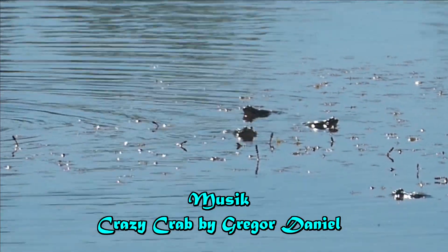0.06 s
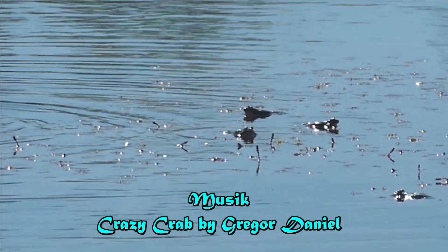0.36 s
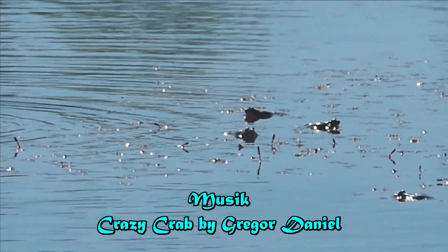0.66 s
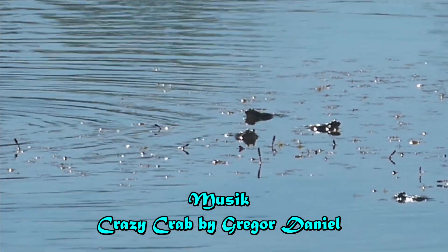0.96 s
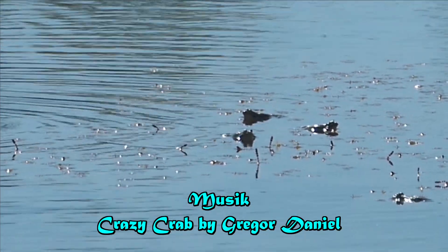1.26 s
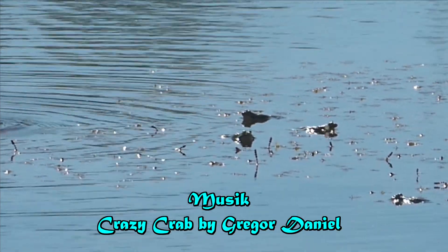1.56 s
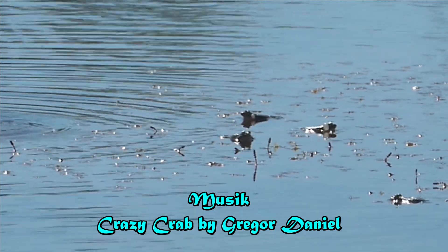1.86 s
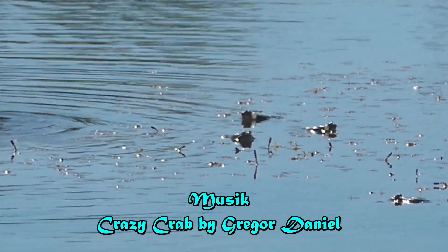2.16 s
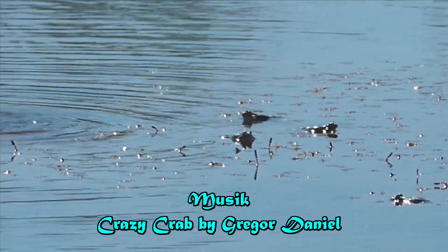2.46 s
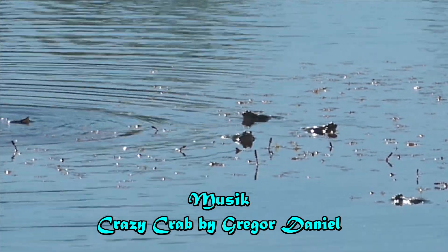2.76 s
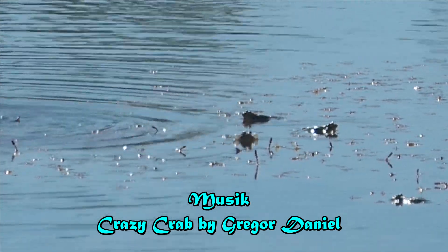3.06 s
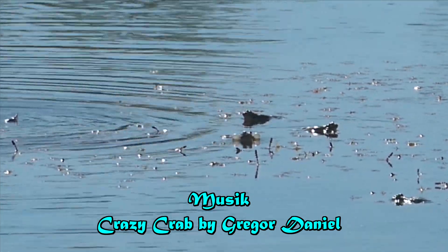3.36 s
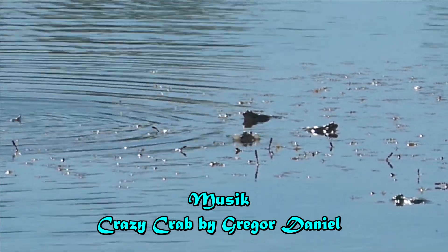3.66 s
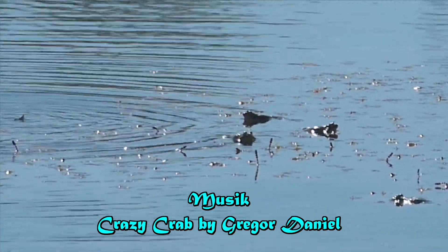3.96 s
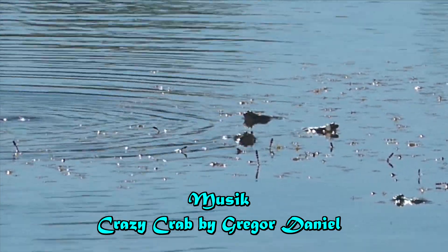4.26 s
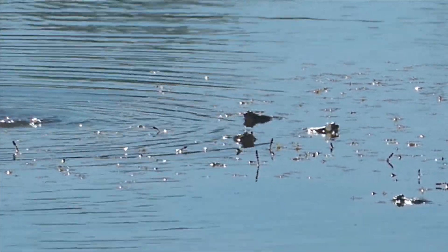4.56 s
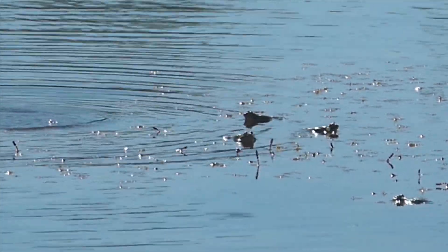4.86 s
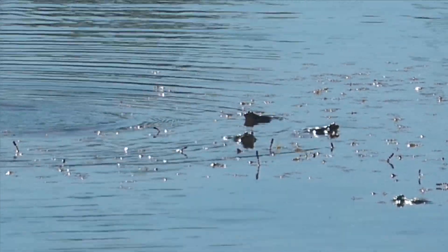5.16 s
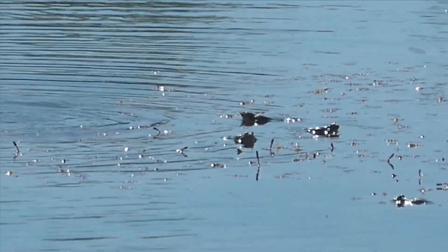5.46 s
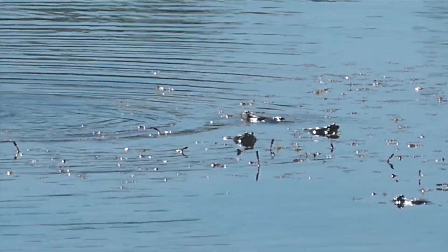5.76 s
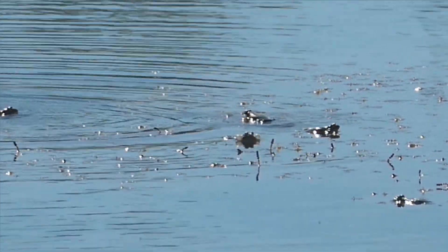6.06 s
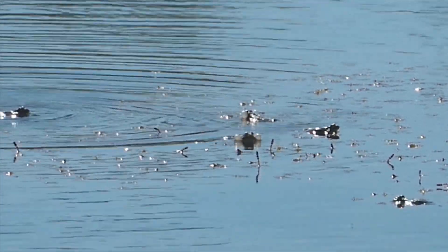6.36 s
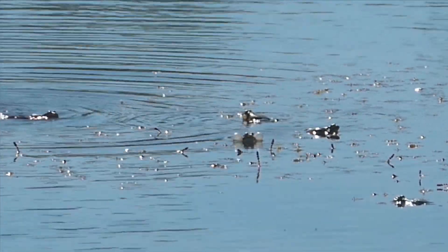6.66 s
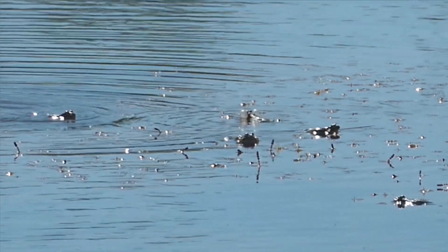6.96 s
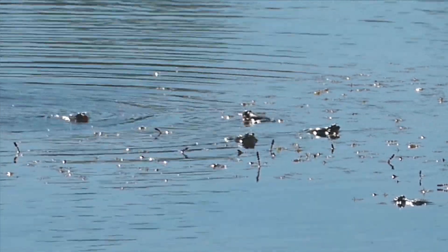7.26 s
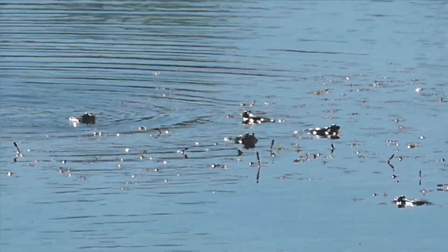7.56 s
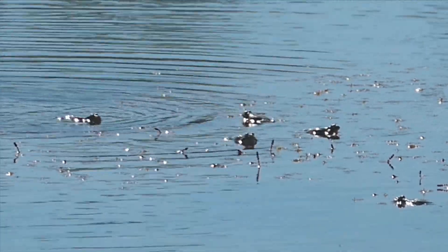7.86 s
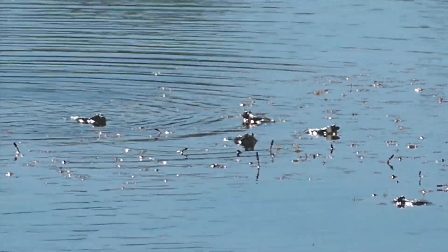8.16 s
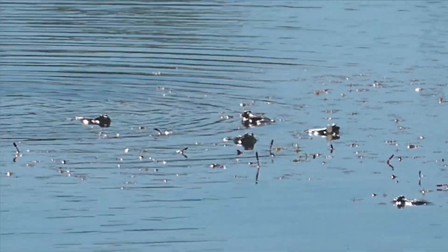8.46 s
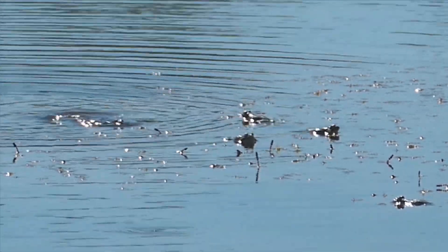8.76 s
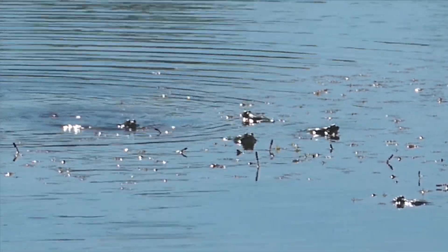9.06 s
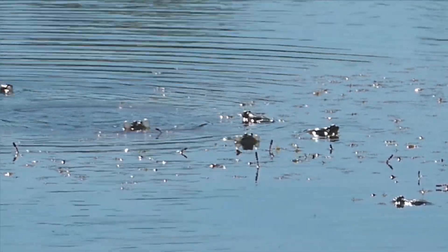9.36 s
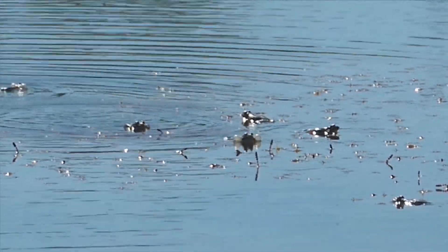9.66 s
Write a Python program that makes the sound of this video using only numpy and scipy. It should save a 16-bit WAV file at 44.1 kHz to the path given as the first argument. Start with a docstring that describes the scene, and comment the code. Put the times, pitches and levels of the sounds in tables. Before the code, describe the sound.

Close pond frogs call in overlapping laughing quacks, rattles and low croaks over a distant chorus and faint rumble.

```python
"""Marsh frogs on a pond

Close to the microphone, straight ahead, frogs call over each other: laughing runs of short quacks,
longer rattles and low croaks. Each note is a burst of larynx pulses that ring the vocal sacs, slowing
into separate ticks as the air runs out. Farther off a chorus burbles over a faint rumble, the banks
answer softly, and three hoots carry from across the water."""
import sys
import numpy as np
from scipy import signal
from scipy.fft import rfft, irfft, next_fast_len
from scipy.io import wavfile
from scipy.ndimage import map_coordinates

SR = 44100
rng = np.random.default_rng(int(sys.argv[2]) if len(sys.argv) > 2 else 0)


def pcm_store(signal):
    """Save signal as 16-bit PCM."""
    levels = np.round(np.clip(np.atleast_2d(signal), -1, 1) * 32767)
    wavfile.write(sys.argv[1], SR, levels.astype(np.int16).T)


N = 428211

# Near runs. Rasp, overtone and whistle are relative to the level; each kind of call adds its own trims.
# (first note [s], last note [s], count, hurry [+ speeds up, - slows], note length [s],
# first sac pitch [Hz], last [Hz], first level [dB], midway [dB], last [dB], rasp [dB],
# first overtone [Hz], last [Hz], overtone [dB], whistle [Hz], whistle [dB])
NEAR_QUACK_RUNS = [(0.0, 0.394, 5, -0.011, .046, 2246, 2280, -30.5, -27, -33.5, 0.5, 4040, 3990, -6, 8760, -39.5),
                   (0.504, 0.983, 6, 0, .029, 2364, 2456, -32, -31, -30.5, -16, 4070, 3940, -22, 9200, -53),
                   (1.386, 1.858, 6, 0.0023, .038, 2400, 2354, -32, -25, -27.5, 0, 3930, 3960, -6, 9350, -39.5),
                   (2.04, 2.435, 5, -0.016, 0.035, 2820, 2670, -38, -38, -40.5, -26.5, 4020, 3900, -15.5, 10500, -47),
                   (2.54, 3.345, 10, .07, .032, 2410, 2450, -33, -26.5, -29, -4, 3870, 4050, -7, 9400, -49),
                   (4.03, 4.105, 2, 0, 0.028, 2170, 2150, -45.5, -45, -45, -29, 4470, 4550, -11, 9500, -51),
                   (4.385, 4.79, 5, -.1, 0.064, 2130, 2330, -38, -38, -40.5, -22.5, 4930, 4690, -12.5, 10400, -35.5),
                   (4.975, 5.258, 4, -0.042, .038, 2260, 2387, -35, -33.5, -29, -28, 4000, 3960, -25, 10750, -42.5),
                   (6.165, 6.553, 5, 0, 0.036, 2390, 2320, -34.5, -31.5, -34, -5.5, 4270, 4130, -19, 9100, -54),
                   (7.865, 8.06, 3, -0.012, .028, 2290, 2360, -40, -35.5, -36, -10, 4400, 4230, -11, 10000, -55),
                   (8.128, 8.565, 5, 0.021, 0.041, 2190, 2320, -43.5, -28.5, -35.5, -11, 4440, 4170, -22.5, 9700, -49),
                   (8.897, 9.155, 6, -0.062, 0.033, 2320, 2450, -38.5, -41, -41, -16.5, 3850, 3830, -23, 9370, -54)]
NEAR_RATTLE_RUNS = [(0.97, 1.372, 5, .1, 0.074, 1798, 1896, -30.5, -23, -25.5, -14, 4440, 3700, -9.5, 9760, -46),
                    (1.52, 2.135, 8, .2, .06, 1575, 1842, -32.5, -24, -29, -12.5, 5090, 4800, -16, 9770, -55),
                    (3.045, 3.548, 6, -0.1, 0.044, 1824, 1700, -28.5, -19, -23.5, -13, 4430, 4170, -9.5, 9900, -51.5),
                    (3.18, 3.4, 3, -0.058, 0.043, 1880, 1918, -22, -21, -23, -8.5, 4020, 3810, -5.5, 10630, -63),
                    (4.387, 4.768, 5, -0.071, 0.066, 1742, 1910, -23.5, -31, -24.5, -10.5, 3780, 4000, -18, 10460, -44),
                    (5.028, 5.578, 6, -.03, .052, 1928, 1676, -26, -22, -31.5, -12, 3970, 3780, -2, 10200, -34.5),
                    (5.67, 6.074, 5, 0.034, 0.035, 1722, 1832, -25.5, -24.5, -29, -14, 4240, 4030, -15, 9500, -33),
                    (6.197, 6.725, 6, -0.0017, 0.045, 1820, 1666, -27, -19.5, -25, -15, 4584, 3770, -10.5, 9870, -56.5),
                    (6.812, 7.287, 6, .02, 0.04, 1750, 1627, -30, -29.5, -31.5, -9, 4070, 4100, -7, 9530, -30.5),
                    (7.485, 7.818, 4, 0.056, 0.041, 1927, 1774, -20.5, -21.5, -21.5, -12, 3770, 3830, -2.5, 10480, -55.5),
                    (7.915, 8.672, 8, -.1, .05, 1857, 1893, -24, -24.5, -28.5, -14, 4820, 4870, -14, 9870, -51),
                    (8.545, 8.83, 4, 0.036, .035, 1780, 1654, -25, -31, -26, -18.5, 4160, 4200, -11, 9530, -36.5)]
# Near single calls: (start [s], length [s], early sac pitch [Hz], late sac pitch [Hz], level [dB],
# rasp relative to the level [dB], overtone [Hz])
NEAR_QUACKS = [(2.386, 0.028, 2524, 2460, -42, -23, 3900), (2.59, .008, 2500, 2410, -50.5, 1.5, 3970),
               (.832, 0.01, 2450, 2440, -43, -6, 3970), (.924, 0.0066, 2450, 2260, -43.5, -1, 3970),
               (2.604, .008, 2750, 2680, -37, -9, 3970), (5.195, 0.037, 2486, 2740, -29.5, -33, 3470),
               (6.025, 0.02, 2610, 2360, -43.5, 4, 3560), (9.105, 0.023, 2410, 2380, -45, 0, 3640)]
NEAR_RATTLES = [(0, 0.055, 1817, 1567, -29, -22.5, 4080), (.236, 0.043, 1720, 1694, -30.5, -29, 4270),
                (.405, 0.053, 1777, 1880, -29.5, -9.5, 3860), (.6, .05, 1560, 1497, -32, -12.5, 3950),
                (.74, 0.048, 1690, 1766, -34.5, -14, 4500), (.858, 0.03, 1900, 1864, -32.5, -11.5, 3350),
                (1.8, 0.19, 1604, 1676, -32.5, -8.5, 4320), (2.44, 0.048, 1790, 1890, -34.5, -10, 4080),
                (2.62, 0.12, 1610, 1638, -35, -12, 4060), (2.75, .14, 1763, 1603, -30.5, -11.5, 3930),
                (3.651, 0.042, 1763, 1667, -27.5, -9, 3950), (3.713, 0.012, 1680, 1680, -35.5, -15.5, 4100),
                (4.29, 0.16, 1745, 1602, -29, -8, 3390), (4.835, 0.12, 1600, 1654, -23.5, -20, 4180),
                (5.305, 0.03, 1580, 1507, -24, -30.5, 4200), (5.385, 0.027, 1620, 1530, -22, -27.5, 3870),
                (5.43, .11, 1677, 1606, -24.5, -45.5, 3800), (6.602, 0.019, 1550, 1510, -33, -18.5, 3860),
                (6.93, 0.24, 1705, 1746, -30.5, -24, 4200), (7.37, .14, 1760, 1710, -22, -16, 3870),
                (8.17, 0.14, 1720, 1650, -28, -22, 4400), (8.64, .11, 1853, 1846, -31.5, -25, 4300),
                (7.292, .06, 1694, 1670, -30, -16.5, 3250), (8.275, 0.032, 1560, 1522, -27.5, -18.5, 4370),
                (8.71, .165, 1697, 1590, -23, -30.5, 4100), (9.22, 0.093, 1850, 1726, -24, -21.5, 4200),
                (9.295, 0.12, 1606, 1596, -24, -18, 3700), (9.425, .045, 1683, 1630, -22.5, -15, 3650),
                (9.485, 0.1, 1817, 1795, -27.5, -12.5, 4180), (9.595, .05, 1820, 1740, -24.5, -11.5, 4350),
                (9.648, .06, 1815, 1742, -26, -9, 3850)]
NEAR_CROAKS = [(0, 0.047, 1120, 1122, -26, -37, 4260), (.14, 0.058, 1160, 1204, -31.5, -29, 4100),
               (.45, 0.15, 1054, 1116, -27.5, -17, 4280), (.735, .05, 540, 686, -39, -31.5, 4500),
               (.768, 0.069, 900, 1140, -34.5, -22, 4500), (.828, 0.044, 1160, 1070, -36, -23.5, 3470),
               (.84, 0.047, 810, 683, -44, -16, 3500), (1.05, 0.18, 1172, 1237, -27.5, -16, 4500),
               (1.36, .12, 1092, 1140, -27, -13.5, 3930), (1.62, .1, 1255, 1272, -28, -30, 3920),
               (2.03, .18, 1147, 1217, -23.5, -12.5, 3460), (2.2, 0.1, 1206, 1275, -29, -20.5, 4240),
               (2.39, 0.15, 1230, 1274, -29.5, -22.5, 3950), (2.72, .15, 1228, 1095, -28, -23.5, 4000),
               (2.95, 0.12, 1016, 1060, -35, -19.5, 3460), (3.31, 0.12, 1241, 1113, -37, -17, 3900),
               (3.49, 0.1, 1042, 1155, -23, -13.5, 3750), (3.725, .11, 1238, 1300, -30, -15, 4100),
               (3.85, 0.068, 1063, 1110, -28.5, -25.5, 3540), (3.91, 0.059, 1430, 1580, -31, -17.5, 4100),
               (4.06, 0.12, 1050, 1215, -43, -20, 4400), (4.174, 0.033, 1260, 1400, -37, -12.5, 3900),
               (4.27, 0.23, 983, 1118, -32.5, -11.5, 3560), (4.42, 0.13, 1120, 1126, -29.5, -5.5, 3830),
               (4.77, 0.13, 1179, 1023, -29, -12, 4020), (5.06, .09, 1210, 1170, -29, -28.5, 4000),
               (5.52, 0.084, 1131, 1292, -30.5, -29.5, 3820), (5.89, 0.088, 1316, 1210, -30.5, -20.5, 4100),
               (6.03, 0.079, 1130, 1064, -31, -12, 3780), (6.125, 0.06, 1050, 1136, -22, -15.5, 3600),
               (6.17, 0.11, 1227, 1254, -26, -6.5, 3200), (6.44, 0.085, 1197, 1231, -28.5, -20.5, 4180),
               (6.68, 0.11, 737, 833, -41, -33, 3600), (6.73, 0.031, 930, 1023, -30.5, -16.5, 3770),
               (6.78, 0.079, 1190, 1234, -25, -17.5, 3540), (6.865, 0.041, 1030, 953, -31, -17.5, 3640),
               (7.135, 0.045, 1220, 1344, -34.5, -28.5, 4100), (6.89, .21, 1234, 1186, -28, -17, 3940),
               (7.3, 0.12, 1223, 1194, -26.5, -19, 4000), (7.47, .17, 1266, 1266, -25, -12.5, 3840),
               (7.65, 0.17, 1256, 1362, -29, -22, 4240), (7.93, 0.17, 1357, 1287, -30, -20, 4670),
               (8.47, 0.12, 1370, 1142, -28, -9.5, 4080), (8.72, 0.18, 1068, 1256, -30.5, -36.5, 4170),
               (9.04, 0.093, 1130, 1040, -32, -19.5, 4190), (9.13, .035, 1091, 1157, -22.5, -21.5, 3500),
               (9.25, 0.13, 1145, 1092, -34.5, -8, 3700), (9.42, .16, 1219, 1280, -26.5, -13, 3600),
               (9.6, 0.12, 1065, 1210, -30.5, -48, 4090)]
# Spectra of the snap in the mouth and the knock in the throat: (frequency [Hz], gain [dB])
MOUTH_SPECTRUM = [(100, -41), (1500, -27), (2400, 1), (3250, 11), (3550, 8.5), (3950, 5), (4300, -12.5),
                  (5000, -11.5), (9000, -30.5), (12500, -25.5), (15000, -40.5)]
THROAT_SPECTRUM = [(60, -54), (150, -26.5), (290, -7.5), (360, 3.5), (520, 14), (800, -1), (1150, 16.5),
                   (1500, -14.5), (2500, 6), (4000, -44), (9000, -67.5)]
# Swell of the far chorus's three layers: (time [s], relative level [dB])
BURBLE_LEVELS = [(0.0, -43.5), (0.57, -39.5), (0.7, -45.5), (0.9, -43), (1.32, -36), (2.0, -40.5),
                 (2.16, -30.5), (2.3, -39.5), (2.54, -41.5), (2.68, -38), (3.22, -43), (3.43, -38),
                 (3.86, -40), (4.0, -44.5), (4.19, -42.5), (4.44, -35.5), (5.0, -38), (5.11, -40),
                 (5.46, -37), (5.73, -39.5), (6.11, -32), (6.54, -43), (6.68, -46), (6.76, -36.5),
                 (6.89, -30), (6.95, -33.5), (7.11, -39), (7.36, -42.5), (7.49, -36), (7.68, -41),
                 (8.71, -36.5), (8.9, -40.5), (9.19, -41.5), (9.36, -36), (9.55, -40.5), (9.71, -34.5)]
BIG_FROG_LEVELS = [(0.0, -36), (0.81, -47.5), (1.05, -33), (1.16, -33), (2.38, -30), (2.51, -34),
                   (3.08, -36), (3.46, -30), (3.78, -37), (3.95, -45), (4.22, -41.5), (4.49, -29),
                   (4.62, -33.5), (5.06, -43), (5.46, -29.5), (5.62, -39.5), (5.81, -36.5), (6.11, -27),
                   (6.38, -31.5), (6.54, -41), (6.79, -39), (6.95, -24.5), (7.11, -38), (7.3, -37.5),
                   (7.54, -25.5), (7.98, -40.5), (8.33, -33), (8.71, -32.5), (8.87, -40.5), (9.11, -32.5),
                   (9.27, -33), (9.71, -27)]
SMALL_FROG_LEVELS = [(0.0, -34.5), (0.38, -37), (0.84, -45), (1.22, -33.5), (1.89, -26), (2.14, -35),
                     (2.51, -39), (2.68, -43.5), (3.11, -43), (3.3, -30), (3.49, -34), (3.6, -38),
                     (4.05, -54), (4.33, -51), (4.49, -28.5), (4.79, -26), (5.11, -33), (5.38, -28),
                     (5.54, -43), (5.81, -39), (6.44, -29), (6.79, -44.5), (6.95, -33), (7.11, -47),
                     (7.3, -46), (7.44, -25.5), (7.54, -19.5), (7.76, -50.5), (7.95, -45.5), (8.17, -32),
                     (8.52, -36), (8.71, -23), (9.0, -39.5), (9.25, -42), (9.41, -28), (9.71, -28.5)]
# Their spectra at a distance: (frequency [Hz], gain [dB])
BURBLE_SPECTRUM = [(60, -58), (150, -38), (290, -11.5), (355, 11), (520, 7), (800, 8), (1100, 3),
                   (1600, -17), (3000, -29), (9000, -70.5)]
BIG_FROG_SPECTRUM = [(100, -55), (600, -27), (900, -6), (1180, 0.5), (1400, -2.5), (1700, -12.5),
                     (2450, -6), (3200, -15), (5000, -25.5), (9000, -58.5)]
SMALL_FROG_SPECTRUM = [(100, -56), (900, -25.5), (1400, -3.5), (1750, 5), (2100, -9), (2450, 1),
                       (3200, -11), (4000, -7.5), (5000, -24.5), (9000, -49)]
# Echo off the banks: (frequency [Hz], time to fall 60 dB [s])
BANK_DECAY = [(300, 0.17), (1500, 0.28), (5000, 1)]
# Swell of the outdoor rumble: (time [s], relative level [dB])
RUMBLE_LEVELS = [(0.0, -51.5), (0.4, -58), (2.27, -45.5), (2.68, -56.5), (5.03, -46.5), (5.35, -53.5),
                 (8.71, -57.5), (9.6, -51.5), (9.71, -53)]
# Spectra of that rumble, the deep one under it and the hiss: (frequency [Hz], gain [dB])
RUMBLE_SPECTRUM = [(25, -38.5), (50, -41.5), (80, -20), (110, -13), (150, -0.5), (220, 2.5), (300, 3),
                   (500, -11.5), (1500, -24), (5000, -71)]
DEEP_SPECTRUM = [(25, -22.5), (50, -14), (80, 3.5), (110, 0), (160, -8), (400, -32.5), (2000, -70.5)]
HISS_SPECTRUM = [(100, -2.5), (1000, -15), (2500, -7), (5000, -9), (10000, -8.5), (15000, -12.5)]
# Hoots across the water: (start [s], length [s], pitch [Hz], level [dB])
FAR_HOOTS = [(4.195, 0.15, 353, -47), (6.662, 0.11, 372, -43), (7.166, 0.16, 365.4, -44)]
# A hoot's harmonics, from the first to the third: (relative level [dB])
HOOT_HARMONICS = [10, 6, -12]
# Treble response of the recorder: (frequency [Hz], gain [dB])
RECORDER_TONE = [(4600, 0), (5100, -11.5), (5500, -24.5), (5900, -43), (7600, -44.5), (8300, -19),
                 (9000, -5.5)]

LEAD_S, TAIL_S = .016, .011  # faint pulses run ahead of a note; a last tick or two trail it


def amp(db):
    """Decibels to gain."""
    return 10 ** (np.asarray(db) / 20)


def unit(x):
    """x scaled to rms 1."""
    return x / np.sqrt(np.mean(x ** 2) + 1e-20)


def unit_like(x, model):
    """x scaled to the energy of model."""
    return x * np.linalg.norm(model) / (np.linalg.norm(x) + 1e-20)


def along(points, hz):
    """Interpolate (frequency, value) points on a log axis."""
    freqs, values = np.transpose(points)
    return np.interp(np.log(hz + 1), np.log(freqs + 1), values)


def swell(points, trim_db):
    """One gain per sample from (time, level) points."""
    times, db = np.transpose(points)
    return amp(np.interp(np.arange(N) / SR, times, db) + trim_db)


def wobble(rate, size):
    """A smooth random curve, rate knots a second."""
    knots = rng.standard_normal(int(size * rate / SR) + 4)
    return map_coordinates(knots, [np.arange(size) * rate / SR])


def filtered(x, response):
    """x times a gain that depends on frequency."""
    size = next_fast_len(N + SR // 2)
    return irfft(rfft(x, size) * response(np.fft.rfftfreq(size, 1 / SR)), size)[..., :N]


def coloured(x, spectrum, size=2048):
    """x through a causal filter of unit energy with this spectrum."""
    cepstrum = irfft(np.log(amp(along(spectrum, np.fft.rfftfreq(size, 1 / SR)))))
    cepstrum[1:size // 2] *= 2
    cepstrum[size // 2 + 1:] = 0
    kernel = irfft(np.exp(rfft(cepstrum)))
    return signal.fftconvolve(x, kernel / np.linalg.norm(kernel))[:len(x)]


def add(track, start, sound):
    """Mix a sound into a track at start seconds."""
    part = track[max(0, round(start * SR)):][:len(sound)]
    part += sound[:len(part)]


def laughing_runs(rows, glide, detune, whistle_drop):
    """The notes of each run: the pace is nearly even, effort swells and ebbs, the resonances drift."""
    notes = []
    for (first_s, last_s, count, hurry, length, first_hz, last_hz, first_db, mid_db, last_db, rasp_db,
         first_overtone, last_overtone, overtone_db, whistle_hz, whistle_db) in rows:
        for u in np.linspace(0, 1, round(count)):
            start = first_s + (last_s - first_s) * (u + hurry * u * (1 - u))
            db = np.interp(u, [0, .5, 1], [first_db, mid_db, last_db])
            sac_hz = first_hz + (last_hz - first_hz) * u
            sac_hz *= np.exp(detune * rng.standard_normal())
            overtone_hz = first_overtone + (last_overtone - first_overtone) * u
            overtone_hz *= np.exp(detune * rng.standard_normal())
            notes.append((start, length, sac_hz * (1 - glide), sac_hz * (1 + glide), db, rasp_db,
                          overtone_hz, overtone_db, whistle_hz * (1 - whistle_drop * (u - .5)), whistle_db))
    return notes


def single_calls(rows, whistle_hz=10330):
    """Lone notes, whose overtone and whistles grow with their rasp."""
    return [(*note, rasp_db, overtone_hz, rasp_db, whistle_hz, rasp_db - 34.5)
            for *note, rasp_db, overtone_hz in rows]


def larynx(t, length, pulse_hz, slowing_hz_per_s, end_hz, attack, release, jitter):
    """One note's pulses: air pressure swells and drops; the rate sags, then slows into separate ticks."""
    sagging_hz = pulse_hz * (1 - .05 * (t / length - .5))
    slowing_hz = end_hz + slowing_hz_per_s * (length - t)
    hz = np.maximum(np.minimum(slowing_hz, sagging_hz), 75)
    hz *= np.exp(.06 * rng.standard_normal())  # each note has its own pace
    hz *= np.exp(.04 * wobble(70, len(t)))
    cycles = np.cumsum(hz) / SR + rng.random()
    at = np.flatnonzero(np.diff(np.floor(cycles)))
    slip, strength = rng.standard_normal((len(at), 2)).T
    slipped = np.clip(at + jitter * slip * SR / hz[at], 0, len(t) - 1).astype(int)
    corners = [-LEAD_S, 0, attack * length, (1 - release) * length, length, length + TAIL_S]
    pressure = np.interp(t[at], corners, [.13, .26, 1, 1, .32, .029])
    return np.bincount(slipped, pressure * amp(1.3 * strength), len(t) + SR // 50)


def ringing(pulses, hz, ring_s, sustain=0):
    """A gliding resonance of rms 1: each pulse strikes it afresh, and a share (sustain) sings on."""
    t = np.arange(SR // 60) / SR
    decay = (1 - np.exp(-2 * t / ring_s)) * np.exp(-t / ring_s)
    at = np.flatnonzero(pulses)[:, None]
    samples = (at + np.arange(len(t))).ravel()
    mixed = lambda rings: np.bincount(samples, (pulses[at] * rings).ravel(), len(pulses))
    struck = mixed(decay * np.sin(2 * np.pi * hz[at] * t))
    sung = mixed(decay) * np.sin(2 * np.pi * np.cumsum(hz) / SR)
    return unit((1 - sustain) * unit(struck) + sustain * unit(sung))


def whistle(pulses, hz):
    """A thin, high resonance whose pitch wanders."""
    return ringing(pulses, hz * np.exp(.022 * wobble(40, len(pulses))), ring_s=.0007)


def reeds():
    """The direct path to the microphone plus a few milliseconds of scatter off water and reeds."""
    t = np.arange(SR // 80) / SR
    scatter = rng.standard_normal(len(t)) * t * np.exp(-t / .0018)
    path = .55 * scatter / np.linalg.norm(scatter)
    path[0] = 1
    return path / np.linalg.norm(path)


def near_frog(notes, *, sac_s, sac_db, sustain, arch, chest_db, nasal_db, overtone_s, overtone_db,
              fall, waver, second_whistle_db, rasp_db, throat_db, **breath):
    """Pulses ring sac, chest, nose, an overtone and two whistles, snap in the mouth, knock in the throat."""
    voice, mouth, throat = np.zeros((3, N))
    for (start, length, early_hz, late_hz, db, note_rasp_db,
         overtone_hz, note_overtone_db, whistle_hz, whistle_db) in notes:
        t = np.arange(-LEAD_S, length + TAIL_S, 1 / SR)
        pulses = larynx(t, length, **breath)
        size = len(pulses)
        u = np.clip((np.arange(size) / SR - LEAD_S) / length, 0, 1)  # progress through the note
        # the sac's skin tightens and slackens, so its pitch arches (or sags) and flutters
        stretch = 1 + arch * (1 / 3 - (2 * u - 1) ** 2) + .02 * wobble(55, size)
        sac_hz = (early_hz + (late_hz - early_hz) * (2 * u - .5)) * stretch
        sinking = 1 - fall * (u - .5) + waver * wobble(120, size)
        body = amp(sac_db) * ringing(pulses, sac_hz, sac_s, sustain)
        body += amp(chest_db) * ringing(pulses, .4725 * sac_hz, ring_s=.002)
        body += amp(nasal_db) * ringing(pulses, 1.375 * sac_hz, ring_s=.00066)
        body += amp(overtone_db + note_overtone_db) * ringing(pulses, overtone_hz * sinking, overtone_s)
        whistles = whistle(pulses, whistle_hz)
        whistles += amp(second_whistle_db) * whistle(pulses, 1.2 * whistle_hz)
        path = reeds()
        call = signal.fftconvolve(body + amp(whistle_db) * whistles, path)
        snaps = signal.fftconvolve(unit(pulses), path)
        gain = amp(db) * np.sqrt(length * SR / size)
        add(voice, start - LEAD_S, gain * unit_like(call, body))
        add(mouth, start - LEAD_S, gain * amp(note_rasp_db) * snaps)
        add(throat, start - LEAD_S, gain * unit(pulses))
    rasp = amp(rasp_db) * coloured(mouth, MOUTH_SPECTRUM)
    knock = amp(throat_db) * coloured(throat, THROAT_SPECTRUM)
    return voice + rasp + knock


def far_frogs(spectrum, pulse_hz, ring_hz, ring_s, spread):
    """Three distant frogs call on and on, each note with its own pulse rate and gliding resonance."""
    typical_note_s, longest_pause_s = .09, .04
    track = np.zeros(N)
    for _ in range(3):
        start = -typical_note_s * rng.random()
        while start < N / SR:
            long, fast, high, glide, loud = rng.uniform(-1, 1, 5)
            length = typical_note_s * (1 + long / 2)
            t = np.arange(-LEAD_S, length + TAIL_S, 1 / SR)
            pulses = larynx(t, length, pulse_hz * np.exp(.3 * fast), slowing_hz_per_s=20000,
                            end_hz=170, attack=.3, release=.3, jitter=.035)
            hz = ring_hz * np.exp(spread * (high + glide * np.linspace(-.5, .5, len(pulses))))
            add(track, start, amp(3 * loud) * ringing(pulses, hz, ring_s))
            start += length + longest_pause_s * rng.random()
    return unit(coloured(track, spectrum))


def far_chorus():
    """The rest of the pond: throaty burble, and big and small frogs ringing their sacs."""
    burble = far_frogs(BURBLE_SPECTRUM, pulse_hz=200, ring_hz=590, ring_s=.0004, spread=.81)
    big = far_frogs(BIG_FROG_SPECTRUM, pulse_hz=230, ring_hz=1138, ring_s=.0013, spread=.11)
    small = far_frogs(SMALL_FROG_SPECTRUM, pulse_hz=280, ring_hz=1803, ring_s=.00056, spread=.12)
    return (swell(BURBLE_LEVELS, trim_db=-1) * burble
            + swell(BIG_FROG_LEVELS, trim_db=-1.5) * big
            + swell(SMALL_FROG_LEVELS, trim_db=-2.5) * small)


def open_air(hum_hz=122.7):
    """A swelling outdoor rumble over a steady deep one, a faint hum and a thin, wide hiss."""
    shaped = lambda noise, spectrum: unit(filtered(noise, lambda hz: amp(along(spectrum, hz))))
    rumble = shaped(rng.standard_normal(N), RUMBLE_SPECTRUM)
    deep = shaped(rng.standard_normal(N), DEEP_SPECTRUM)
    hum = np.sin(2 * np.pi * hum_hz * np.arange(N) / SR + .56 * wobble(6.4, N))
    hiss = shaped(rng.standard_normal((2, N)) + .52 * rng.standard_normal(N), HISS_SPECTRUM)
    steady = amp(-67) * deep + amp(-61.5) * hum + amp(-57.5) * hiss
    return swell(RUMBLE_LEVELS, trim_db=2) * rumble + steady


def bank_echo(calls):
    """A soft scatter from reeds and trees, 5 ms behind the direct sound, its treble lingering longest."""
    hz, t, noise = signal.stft(rng.standard_normal(SR // 2), SR, nperseg=256)
    decay = amp(-60 * t / along(BANK_DECAY, hz)[:, None])
    _, tail = signal.istft(noise * decay, SR, nperseg=256)
    delayed = np.pad(calls, (SR // 200, 0))
    return signal.fftconvolve(delayed, tail / np.linalg.norm(tail))[:N]


def far_hoots():
    """Short, soft notes of even pitch from far across the water."""
    track = np.zeros(N)
    for start, length, hz, db in FAR_HOOTS:
        size = round(length * SR)
        phase = 2 * np.pi * hz * np.arange(size) / SR + .3 * wobble(30, size)
        tone = sum(amp(level) * np.sin(k * phase) for k, level in enumerate(HOOT_HARMONICS, 1))
        add(track, start, amp(db) * unit(tone * signal.windows.tukey(size, .5)))
    return track


def scene():
    """The pond at the microphone: four kinds of near call over the far chorus, all straight ahead."""
    quacks = near_frog(
        laughing_runs(NEAR_QUACK_RUNS, glide=.0051, detune=.012, whistle_drop=.06)
        + single_calls(NEAR_QUACKS),
        pulse_hz=480, slowing_hz_per_s=7000, end_hz=160, attack=.15, release=.45, jitter=.015,
        sac_s=.0014, sac_db=-1, sustain=.08, arch=.011, chest_db=-25.5, nasal_db=-15,
        overtone_s=.0083, overtone_db=-4.5, fall=.018, waver=.004,
        second_whistle_db=4, rasp_db=-7, throat_db=-14.5)
    rattle_runs = near_frog(
        laughing_runs(NEAR_RATTLE_RUNS, glide=.002, detune=.015, whistle_drop=.05),
        pulse_hz=400, slowing_hz_per_s=6000, end_hz=170, attack=.14, release=.23, jitter=.018,
        sac_s=.0023, sac_db=-2, sustain=.5, arch=.05, chest_db=-22.5, nasal_db=-12.5,
        overtone_s=.0016, overtone_db=-12, fall=.047, waver=.007,
        second_whistle_db=-3, rasp_db=-2.5, throat_db=-14)
    lone_rattles = near_frog(
        single_calls(NEAR_RATTLES),
        pulse_hz=265, slowing_hz_per_s=4500, end_hz=170, attack=.12, release=.093, jitter=.012,
        sac_s=.0018, sac_db=-1, sustain=.48, arch=-.016, chest_db=-20.5, nasal_db=-17,
        overtone_s=.0009, overtone_db=-9, fall=.06, waver=.02,
        second_whistle_db=-9.5, rasp_db=-7, throat_db=-16.5)
    croaks = near_frog(
        single_calls(NEAR_CROAKS),
        pulse_hz=215, slowing_hz_per_s=2700, end_hz=150, attack=.19, release=.04, jitter=.03,
        sac_s=.0026, sac_db=-2, sustain=.4, arch=-.06, chest_db=-15.5, nasal_db=-24.5,
        overtone_s=.0009, overtone_db=-8.5, fall=.1, waver=.02,
        second_whistle_db=-7, rasp_db=-13, throat_db=-14)
    frogs = quacks + rattle_runs + lone_rattles + croaks + far_chorus()
    return frogs + amp(-16.5) * bank_echo(frogs) + far_hoots() + open_air()


def record(dry):
    """The recorder: a bass cut, a narrow notch at 3 kHz, a deep dip above 5 kHz and the band limit."""
    bass_hz, notch_hz, width_hz, top_hz = 90, 2990, 80, 15600
    bass = lambda hz: hz ** 2 / np.hypot(hz ** 2, bass_hz ** 2)
    notch = lambda hz: np.abs(hz - notch_hz) / np.hypot(hz - notch_hz, width_hz)
    treble = lambda hz: amp(along(RECORDER_TONE, hz)) * (hz < top_hz)
    return filtered(dry, lambda hz: bass(hz) * notch(hz) * treble(hz))


dry = scene()
out = record(dry)
pcm_store(out)
```